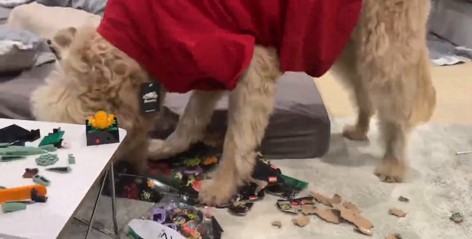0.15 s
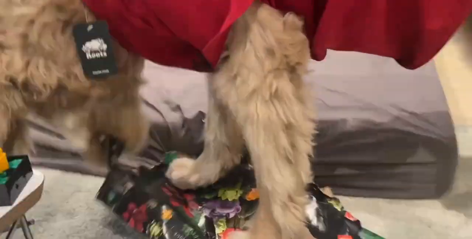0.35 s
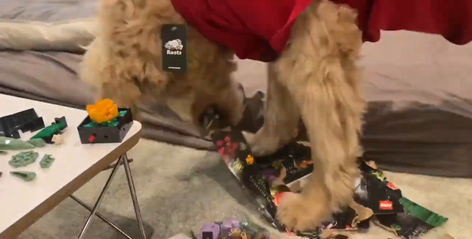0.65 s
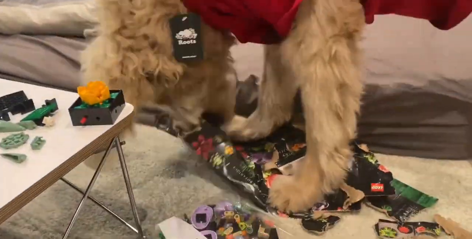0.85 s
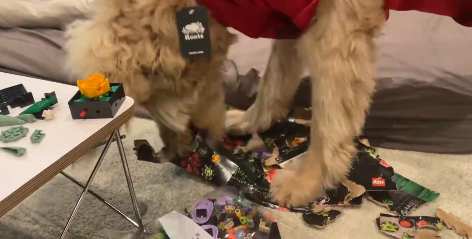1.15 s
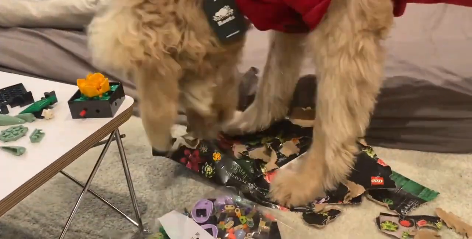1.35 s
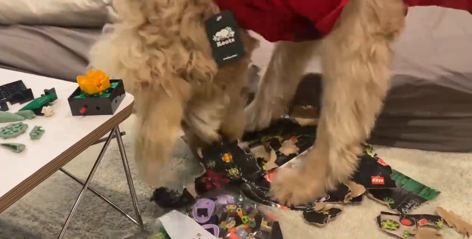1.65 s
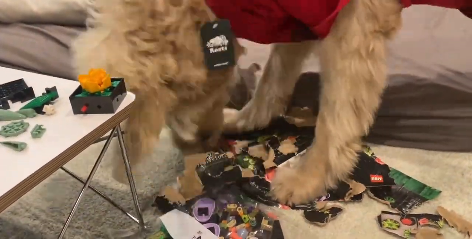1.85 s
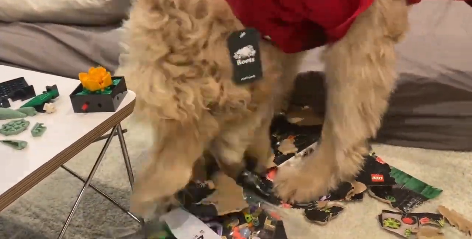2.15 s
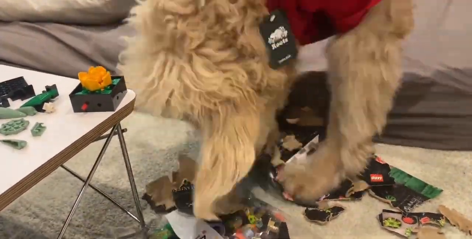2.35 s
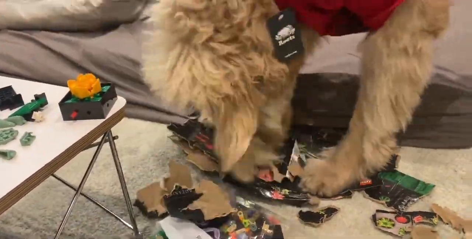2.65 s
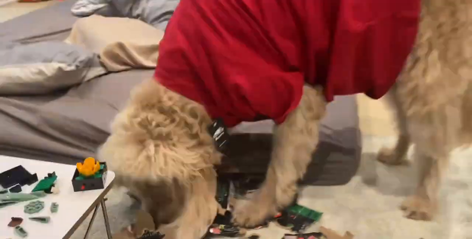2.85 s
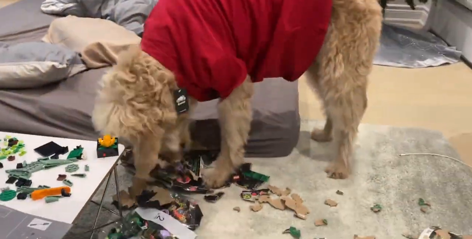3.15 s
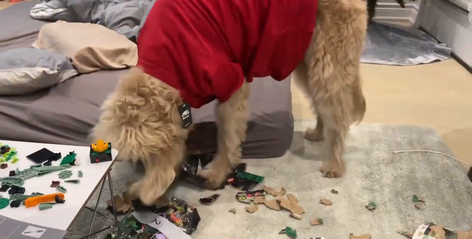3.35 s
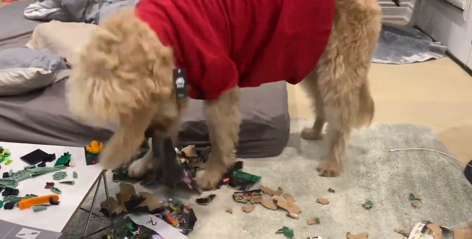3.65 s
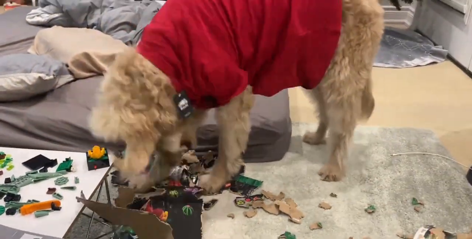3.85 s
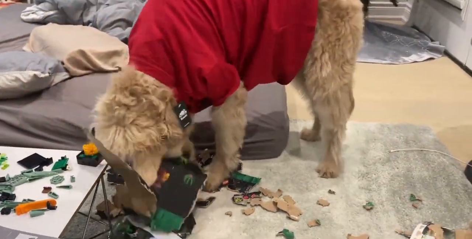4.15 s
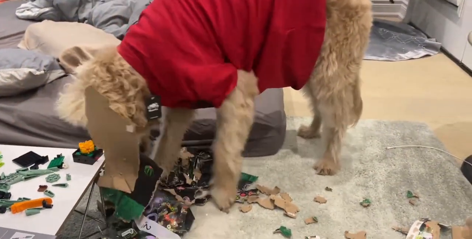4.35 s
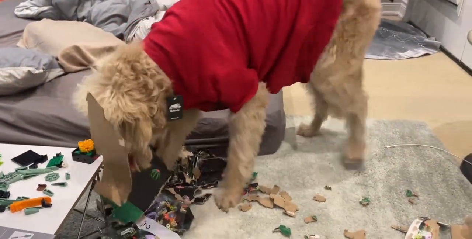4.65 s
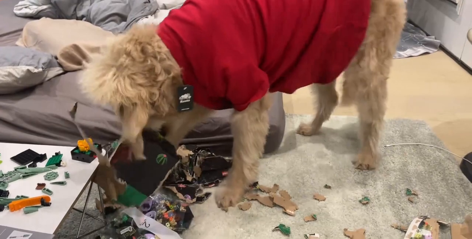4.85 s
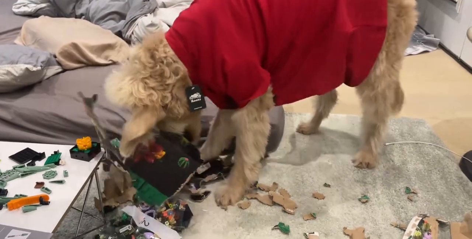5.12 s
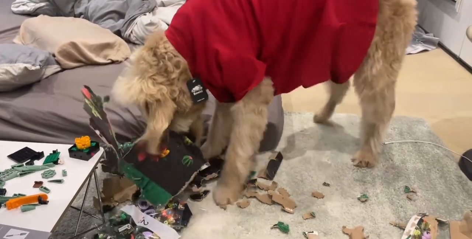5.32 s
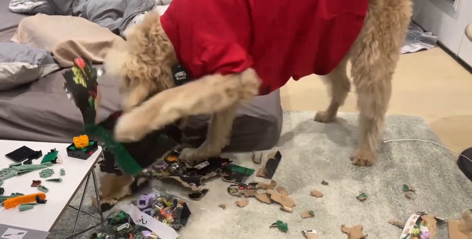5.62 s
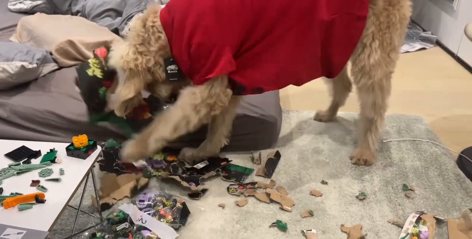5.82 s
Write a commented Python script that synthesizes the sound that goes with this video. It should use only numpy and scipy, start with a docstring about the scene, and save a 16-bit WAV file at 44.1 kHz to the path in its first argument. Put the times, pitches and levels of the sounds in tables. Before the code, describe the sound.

Close stereo sound of teeth tearing card among plastic scraps in a small, soft-furnished room. Bright cracks and fibrous rips cluster irregularly for two seconds, thin out, then return in short bursts. After a change from airy hum to deep rumble, mostly papery sliding, rug friction and light paw knocks remain, slightly left, ending with louder pawing blows on loose card.

```python
"""A dog tears up a printed cardboard box among plastic bags on a rug in a small furnished room. Tugs swell into
rips of crackling fibres; card snaps are short noise bursts with ringing modes of the sheet. Teeth scrape in
runs of slips and plastic crinkles in tiny fractures; near the end paws slap and push loose card. Beneath it all
lies a hum of shaped noise and narrow tones, which gives way to a rumble of shaped noise with a deep sine. The
dog drifts to the left of the microphone, and the rug and bedding leave a short room tail."""
import sys
import numpy as np
from scipy import signal
from scipy.fft import rfft, irfft
from scipy.io import wavfile
from scipy.ndimage import uniform_filter1d, map_coordinates

SR = 44100
rng = np.random.default_rng(int(sys.argv[2]) if len(sys.argv) > 2 else 0)


def pcm_store(signal):
    """Save signal as 16-bit PCM."""
    levels = np.round(np.clip(np.atleast_2d(signal), -1, 1) * 32767)
    wavfile.write(sys.argv[1], SR, levels.astype(np.int16).T)


N = 263718

# The card snaps. Each row: start in seconds, crack level in dB, body against the crack in dB,
# sizzle against the crack in dB, pitch of the knock in Hz, pitch of the crack in Hz.
CARD_SNAPS = [(0.074, -24, -3.5, -12.5, 800, 2670), (0.0784, -35.5, 5.5, -7, 725, 2740),
              (0.084, -43.5, 9, 4, 538, 2500), (0.136, -31, -35, -12, 410, 3870),
              (0.2032, -35, -9, -22, 1270, 2240), (0.243, -40.5, -8, -30, 420, 2020),
              (0.266, -39, -15, -12, 1480, 2620), (0.3352, -31.5, -2, 0.5, 1040, 2120),
              (0.3681, -34, -8, -3.5, 845, 4900), (0.469, -33.5, -2.5, -20, 1230, 3750),
              (0.477, -48, 7.5, -2, 480, 2080), (0.5454, -36.5, -15, -14, 1400, 2550),
              (0.553, -45.5, 3.5, -11, 1540, 4450), (0.5862, -34.5, -4, -9, 1290, 3500),
              (0.625, -49.5, 1, -2, 1080, 2500), (0.653, -50, 7.5, 0, 1140, 2650),
              (0.673, -37.5, -3.5, -7, 640, 2360), (0.7137, -41, -8, 2, 1350, 5400),
              (0.72, -38, -8, -8, 1300, 5160), (0.7333, -23.5, -2, -9, 1166, 5000),
              (0.739, -34, -27, 6.5, 440, 2450), (0.7561, -42, 0, -2, 1200, 5000),
              (0.772, -39, 6.5, 6.5, 1080, 1800), (0.7812, -37, -5.5, -3, 1460, 5150),
              (0.8957, -51.5, -2, -12, 1430, 1690), (0.9156, -34.5, -28, -2.5, 1500, 2100),
              (0.9225, -45, -14, -5, 1400, 2300), (0.929, -30.0, -10, -12, 1160, 4770),
              (0.945, -40, -10, 1.5, 640, 2160), (0.9754, -23, -1.5, -6, 1100, 4830),
              (1.096, -36, -9.5, -10, 1490, 2320), (1.1231, -42, -14, -3, 1110, 2500),
              (1.159, -40.5, -4, 0, 1350, 2100), (1.176, -30.5, 0, 1, 1350, 3980),
              (1.2407, -52.5, -4, -4, 580, 5000), (1.288, -40.5, -11, -10, 1490, 1990),
              (1.3244, -52.5, 8, 3, 476, 2300), (1.3747, -28, -7, -10.5, 1340, 5000),
              (1.3976, -26.5, -1.5, -2.5, 594, 2520), (1.5208, -40.5, -11, -6, 437, 3730),
              (1.534, -35.5, -10.5, 0, 1300, 5060), (1.5816, -34.5, -19, -2, 1400, 4490),
              (1.5945, -45, -3, -2, 1300, 4600), (1.6203, -36, -6, 0, 1120, 2170),
              (1.6275, -21.5, -4, -11, 1120, 2160), (1.629, -29.5, 1, 2, 1420, 3880),
              (1.6513, -34.5, 4, -4, 1400, 5450), (1.655, -29.5, -7, 2, 636, 5400),
              (1.7142, -38.5, -7, -8.5, 1120, 2260), (1.753, -72, -3, 15, 420, 4570),
              (1.8254, -50, -6, 1, 410, 4460), (1.8362, -46.5, -4, 6, 644, 4600),
              (1.847, -49.5, 0.5, -2, 1120, 2800), (1.8748, -28.5, -9, -4.5, 1070, 2250),
              (1.8799, -32.5, -1, -23, 1090, 2080), (1.9195, -49, -6, -1.5, 414, 2600),
              (2.0955, -29, 0.5, -4.5, 690, 1910), (2.162, -48, -12, -6, 600, 5460),
              (2.208, -48, -3, -1.5, 1130, 2600), (2.227, -45.5, -6, 3, 605, 5190),
              (2.2435, -46.5, -12, 2, 1310, 3980), (2.276, -43, -5, 5.5, 1390, 2050),
              (2.3264, -53, -7, 5, 1330, 4120), (2.4033, -46, 5.5, -6, 1120, 2180),
              (2.411, -41, -3.5, 2.5, 1240, 5560), (2.5589, -24.5, 2, -4.5, 1015, 3830),
              (2.7431, -49.5, -9, -12, 414, 5150), (2.9052, -54, -20, -24, 500, 4600),
              (2.958, -49.5, -6, -13, 440, 3200), (3.1252, -52, -10, -11, 800, 2900),
              (3.192, -46.5, 1, -9, 680, 4330), (3.2443, -33, 2, -31, 707, 3600),
              (3.373, -54, -15, 1.5, 590, 5430), (3.4136, -45, -10, -7, 594, 5570),
              (3.4373, -34.5, -17, -24, 507, 3820), (3.5694, -45, -3, -24, 630, 4350),
              (3.596, -31.5, -5, -26, 1530, 3870), (3.6158, -35, -6, -9, 660, 3500),
              (3.637, -45, -4, 0, 1300, 3950), (3.7042, -40, -10, -17, 710, 5350),
              (3.7744, -45.5, 4, -1, 520, 3300), (3.812, -44.5, -8, 4.5, 890, 2260),
              (3.8207, -41, 3, -8, 1410, 2800), (3.8567, -33.0, -5.5, -10, 1140, 3850),
              (3.883, -44, -13, -4, 550, 3400), (3.9085, -53.5, 3, -4, 487, 2800),
              (4.0866, -51.5, -2, -8, 430, 5600), (4.1277, -41, -10, -17, 1360, 3630),
              (4.2135, -41.5, -7, 0, 580, 2980), (4.23, -47.0, -5, -6, 464, 4000),
              (4.2509, -38.5, 0, -13, 1530, 4260), (4.2619, -25, 0, -9.5, 960, 4580),
              (4.2647, -35, 6.5, -5, 525, 3000), (4.3417, -56, 3, -16, 446, 2550),
              (4.3589, -27.5, -11, -5.5, 1540, 3490), (4.6397, -51.5, -5, -19, 814, 2900),
              (4.765, -54.5, -13, -16, 475, 3180), (4.7966, -52.5, -4, -7, 420, 2400),
              (5.223, -57, -1, 7, 585, 4500), (5.236, -49, -10, -3, 690, 3360),
              (5.2446, -43.5, -22.5, 4.5, 523, 3400), (5.95, -44.5, 12.5, -8.5, 1470, 4500)]
# Tugs that rip the card. Each row: height of the tug in seconds, length in seconds, crack level in dB,
# body against the crack in dB.
RIPPING_TUGS = [(0.015, 0.16, -38, -4.5), (0.072, 0.039, -34, -3), (0.266, 0.12, -49, 4.5),
                (0.348, 0.16, -36.5, -7.5), (0.468, 0.012, -24.5, -30), (0.479, 0.034, -36, 0),
                (0.554, 0.047, -41, -15), (0.734, 0.095, -31, -5), (0.764, 0.035, -36, -2),
                (0.911, 0.013, -43, -8), (0.927, 0.048, -41, -13), (1.18, 0.006, -31, -0.5),
                (1.137, 0.068, -37, -11), (1.338, 0.14, -42, -9), (1.543, 0.07, -37.5, -1),
                (1.592, 0.045, -33.5, -9), (1.644, 0.063, -27.5, -2.5), (1.854, 0.065, -40.5, -21),
                (1.881, 0.017, -31, -17), (2.061, 0.041, -43, -6), (2.265, 0.16, -43.5, -6),
                (2.412, 0.1, -40.5, -3), (2.469, 0.024, -44, -3), (2.545, 0.038, -40, -7),
                (2.999, 0.12, -47.5, 3), (3.14, 0.1, -50.5, -18), (3.244, 0.057, -38.5, 0),
                (3.437, 0.095, -46, -12), (3.594, 0.03, -34, -3), (3.609, 0.22, -40.5, -3),
                (3.709, 0.033, -33.5, -5.5), (3.777, 0.18, -39, -3), (4.125, 0.074, -46.5, -1),
                (4.26, 0.11, -40, -13), (4.355, 0.0054, -25.5, -19), (4.373, 0.039, -31.5, -17),
                (4.42, 0.053, -40.5, -7.5), (4.64, 0.094, -53.5, -4.5), (5.27, 0.092, -53, 3)]
# Teeth scrape along the card. Each row: start in seconds, length in seconds, level in dB, pitch in Hz.
TOOTH_SCRAPES = [(0.046, 0.0089, -40.5, 1430), (2.964, 0.015, -60, 2000), (3.007, 0.013, -42, 1530),
                 (3.671, .01, -48.5, 1500), (3.75, 0.025, -54, 2100)]
# How much scraps and bags shift under the dog. Each row: time in seconds, level in dB.
RUSTLE_LEVELS = [(0, -66), (.45, -56.5), (.82, -62), (1.08, -53), (1.24, -56.5), (2.0, -61.5), (2.35, -53),
                 (2.6, -60.5), (2.9, -60), (3.35, -61), (3.75, -56), (3.97, -61), (4.449, -60.5),
                 (4.7, -76.5), (5.13, -54.5), (5.3, -63.5), (5.819, -79.5), (5.89, -50), (5.94, -61),
                 (5.965, -45)]
# Colour of that rustle. In order: body, crack and sizzle, each against the level above in dB.
RUSTLE_COLOUR = [0, -3, -7]
# Paws on loose card. Each row: start in seconds, thump level in dB, clap level in dB, crack level in dB,
# pitch of the knock in Hz.
PAW_BLOWS = [(5.0398, -50, -38.5, -62, 597), (5.05, -67, -41, -55, 695), (5.106, -51, -59, -52, 734),
             (5.1679, -56, -42.5, -57, 482), (5.339, -69, -59, -57, 690), (5.864, -37.5, -44, -42, 394),
             (5.9503, -37, -26, -32.5, 509), (5.9602, -37.5, -27, -43, 890)]
# The big sheet rubs along the rug. Each row: time in seconds, level in dB.
RUB_LEVELS = [(5.03, -75), (5.06, -44), (5.09, -50.5), (5.125, -43.5), (5.2, -56), (5.25, -51), (5.32, -57),
              (5.42, -63)]
# Its printed face slides against fur and scraps. Each row: time in seconds, level in dB.
SLIDE_LEVELS = [(4.86, -97), (4.897, -58.5), (4.912, -50), (4.95, -60), (5.05, -47.5), (5.12, -51.5),
                (5.2, -72), (5.254, -41.5), (5.3, -60), (5.34, -59.5)]
# Resonances of the sliding face before it flexes. Each row: pitch in Hz, width in Hz, gain in dB.
SLIDE_RESONANCES = [(1400, 300, 0), (2900, 1200, 4), (4600, 860, -4), (11300, 2600, -9.5)]
# Resonances of the card before bending. Each row: pitch in Hz, width in Hz, gain in dB.
CARD_RESONANCES = [(449, 220, -2), (640, 120, 1.5), (840, 70, -13.5), (1100, 139, -8.5), (1400, 270, -6),
                   (1970, 290, -4), (2320, 990, 1), (3810, 70, 2), (4700, 940, -3), (12300, 1600, -27)]
# Registers of the card: body, crack, sizzle. Each row: low edge in Hz, high edge in Hz,
# share of the energy in the first spike (0 to 1), left-right likeness (0 to 1).
CARD_REGISTERS = [(394, 1657, 0.39, 0.87), (1490, 6550, 0.21, 0.64), (5650, 13670, 0.28, 0.36)]
# Registers of a paw's blow: thump, clap, crack. Each row: low edge in Hz, high edge in Hz,
# share of the energy in the first spike (0 to 1), left-right likeness (0 to 1).
BLOW_REGISTERS = [(114.5, 320, 0.17, 0.94), (395, 1200, 0.18, 0.66), (1244, 2930, 0.24, 0.3)]
# Left-right difference of the card sounds. Each row: time in seconds, side gain in dB.
SIDE_GAINS = [(.55, 1.5), (.72, -5), (0.948, -1), (2.1, -1.5), (2.3, -1.5), (4.35, -0.5), (4.6, 1.5)]
# Colour of the room's hum. Each row: pitch in Hz, relative density in dB per Hz.
HUM_COLOUR = [(24, -61.5), (40, -22.5), (98, -23), (221, -14), (338, -5), (412, 1.5), (728, -7.5),
              (845, -6), (1080, -10.5), (4680, -20.5), (7130, -41), (11400, -39), (13900, -45),
              (15000, -56.5)]
# Narrow tones in the hum. Each row: pitch in Hz, width of each of two resonances in Hz, level in dB.
HUM_TONE_ROWS = [(398, 6.3, -59), (425, 14, -65), (838, 8.2, -67)]
# Colour of the low rumble. Each row: pitch in Hz, relative density in dB per Hz.
RUMBLE_COLOUR = [(15, -27), (25, -4.5), (75, 4), (392, -5), (1820, -26.5), (2570, -20.5), (3460, -34.5),
                 (4450, -31), (6000, -46.5), (7800, -70), (13200, -120)]

TIME = np.arange(N) / SR
LEVEL_SPAN_S = .01   # the level of a blow is its energy spread over this time
CLICK = 1.15   # the instant of breaking, against the short burst that follows it
CUTOFF_HZ = 14550
# Air pushed by the snapping sheet: columns as in the registers; its level is against the body
FLAP, FLAP_DB = (187, 397, 0.13, 0.83), -28
KNOCK_HZ = 1040   # middle of the knocks
# The lowest mode of the whole sheet, woken by every snap: its level against a middling knock,
# and how much stronger it is under higher ones
SHEET_HZ, SHEET_DB, SHEET_DB_PER_OCTAVE = 440, -12.5, 3.5
# Middle of the cracks, top of a middling crack's band, and how far the band follows the pitch
CRACK_HZ, CRACK_TOP_HZ, CRACK_FOLLOWS = 2800, 5800, 0.27
RING_DB_PER_BODY_DB = -0.25   # thin snaps ring more in crack and sizzle
# Part of a tug spent swelling; its sizzle against its crack
SWELL_SHARE, TEAR_SIZZLE_DB = 0.51, -1
# Fibres splinter around a snap: how long, how loud against it, how far this follows its body
SPLINTER_S, SPLINTER_DB, SPLINTER_FOLLOWS = 0.02, -6.5, 0.29
PAW_OVERTONE = 1.88   # second mode of the slapped sheet, as a multiple of its knock
LAST_STRETCH_S = 4.466   # from here the sheet lies to the left, the rumble sounds and the top is softer
LEFT_LEAD_S = 0.00021   # the sheet's sound then reaches the left side earlier by this
ROOM_T60_S, ROOM_DB = 0.091, -11.5
HUM_DB, RUMBLE_DB, DRONE_DB, DRONE_HZ = -55.5, -54.5, -57, 58.6


def from_db(db):
    """Decibels to gain."""
    return 10 ** (np.asarray(db) / 20)


def rms_one(x):
    """Scale to rms 1."""
    return x / np.sqrt(np.mean(x ** 2) + 1e-20)


def energy_one(x):
    """Scale to energy 1 in each channel on average."""
    return rms_one(x) / np.sqrt(x.shape[-1])


def add(out, s, sound):
    """Mix a sound into out from time s on."""
    start = round(s * SR)
    part = sound[:, :N - start]
    out[:, start:start + part.shape[1]] += part


def stereo_noise(size, alike):
    """White noise whose two channels are partly the same."""
    mid, side = rng.standard_normal((2, size))
    return np.sqrt(1 + alike) * mid + np.sqrt(1 - alike) * side * [[1], [-1]]


def band(x, low_hz, high_hz, order=3):
    """Causal band-pass."""
    return signal.sosfilt(signal.butter(order, [low_hz, high_hz], "band", fs=SR, output="sos"), x)


def resonate(x, hz, width_hz):
    """One resonance, gain 1 on top."""
    r = np.exp(-np.pi * width_hz / SR)
    feedback = [1, -2 * r * np.cos(2 * np.pi * hz / SR), r * r]
    return signal.lfilter(np.array([1, 0, -1]) * (1 - r * r) / 2, feedback, x)


def die_away(power, t60):
    """Spread each impulse of power over an exponential decay."""
    r = from_db(-60 / (t60 * SR)) ** 2
    return signal.lfilter([1 - r], [1, -r], power + 1e-18)


def card_colour(x, stretch=1):
    """The resonances of the card stand out of a broad response; bending stretches their pitch."""
    return x + sum(from_db(gain_db) * resonate(x, hz * stretch, width_hz)
                   for hz, width_hz, gain_db in CARD_RESONANCES)


def kinks(count, register, spike_s, t60, pitches_hz=(), breadth=1.0, rings_db=0, stretches=None, bend=0.36):
    """Sudden buckles at 0 dB: a spike, then a decaying noise ring, drawn afresh for each."""
    low_hz, high_hz, share, alike = register
    t = TIME[:3000]
    raw = np.array([[stereo_noise(len(t), np.sqrt(alike)) * np.exp(-t / spike_s),
                     stereo_noise(len(t), alike) * from_db(-60 * t / t60)] for _ in range(count)])
    # the instant of breaking, on the first sample of each spike
    raw[:, 0, :, 0] += CLICK * np.sqrt(spike_s * SR / 2) * rng.choice([-1, 1], (count, 1))
    for k, hz in enumerate(pitches_hz):   # the smaller the piece that gives way, the higher it sounds
        raw[k] = resonate(raw[k], hz, breadth * hz)
    if stretches is None:
        voiced = band(card_colour(raw), low_hz, high_hz)
    else:   # each piece has a band of its own, and bends the card's resonances along
        voiced = [band(card_colour(x, by ** bend), low_hz * by, high_hz * by, order=4)
                  for x, by in zip(raw, stretches)]
    ring_gains = from_db(np.broadcast_to(rings_db, count))
    blends = [np.sqrt(share) * energy_one(spike) + np.sqrt(1 - share) * gain * energy_one(ring)
              for (spike, ring), gain in zip(voiced, ring_gains)]
    return [energy_one(blend) * np.sqrt(LEVEL_SPAN_S * SR) for blend in blends]


def pitched(sounds, pitches_hz, cycles, mode_db, low_hz=330):
    """The piece that gives way also rings at its own pitch, dying within some cycles; too small to radiate bass."""
    t = TIME[:sounds[0].shape[1]]
    modes = [np.sin(2 * np.pi * hz * t) * from_db(-60 * hz * t / cycles) for hz in pitches_hz]
    modes = band(np.array(modes), low_hz, CUTOFF_HZ)
    gains = from_db(np.broadcast_to(mode_db, len(sounds)))
    return [energy_one(energy_one(sound) + gain * energy_one(mode)) * np.sqrt(LEVEL_SPAN_S * SR)
            for sound, gain, mode in zip(sounds, gains, modes)]


def crackle(per_s, spread_db, spike_t60, ring_t60, even_s, count=3):
    """Tiny uneven fractures, each a spike and a ring coloured in count bands; one rms-1 stream a register."""
    at = np.flatnonzero(rng.random(N) < per_s / SR)
    sizes_db = np.broadcast_to(spread_db, N)[at] * np.minimum(rng.exponential(1, len(at)), 4.5)
    streams = []
    for low_hz, high_hz, share, alike in CARD_REGISTERS:
        breaks = np.zeros((count, N))
        colours_db = rng.uniform(-12, 12, (len(at), count)).T
        breaks[:, at] = from_db(sizes_db + colours_db) ** 2
        power = share * die_away(breaks, spike_t60) + (1 - share) * die_away(breaks, ring_t60)
        # the pull sets the overall rate of work
        power /= np.maximum(uniform_filter1d(power.mean(axis=0), int(even_s * SR)), 1e-9)
        edges = np.geomspace(low_hz, high_hz, count + 1)
        grains = sum(band(stereo_noise(N, alike) * np.sqrt(p), low, high, order=2)
                     for p, low, high in zip(power, edges, edges[1:]))
        streams.append(rms_one(card_colour(grains)))
    return streams


def stick_slip(per_s, t60, spread_db):
    """Uneven catches and slips of a dragged surface, as a gain around 1."""
    slips = rng.random(N) < per_s / SR
    power = die_away(slips * from_db(spread_db * rng.standard_normal(N)) ** 2, t60)
    return np.sqrt(power / np.maximum(uniform_filter1d(power, int(.04 * SR)), 1e-9))


def tears(roundness=0.87):
    """Fibres break in a rush that swells and fades with each tug; a brief rush also surrounds each snap."""
    tugs = [(s, length_s, db + np.array([body_db, 0, TEAR_SIZZLE_DB]))
            for s, length_s, db, body_db in RIPPING_TUGS]
    splinters = [(s, SPLINTER_S,
                  db + SPLINTER_DB + SPLINTER_FOLLOWS * body_db + np.array([body_db, 0, sizzle_db]))
                 for s, db, body_db, sizzle_db, _, _ in CARD_SNAPS]
    power = np.zeros((3, N))
    for s, length_s, levels_db in tugs + splinters:
        near = slice(max(int((s - .25) * SR), 0), int((s + .25) * SR))
        t = TIME[near] - s
        away = np.abs(t / (length_s * np.where(t < 0, SWELL_SHARE, 1 - SWELL_SHARE)))
        power[:, near] += from_db(levels_db[:, None] - 20 * away ** roundness) ** 2
    fibres = crackle(per_s=1500, spread_db=5, spike_t60=.0014, ring_t60=.016, even_s=.014)
    return sum(np.sqrt(p) * stream for p, stream in zip(power, fibres))


def torn_piece(x, boost=0.93, breadth=0.13):
    """A rip sounds through the piece being torn: a resonance glides from the pitch of one crack to the next."""
    s, *_, crack_hz = np.transpose(CARD_SNAPS)
    octave = np.interp(TIME, s, np.log2(crack_hz))
    steps = np.arange(10.5, 12.75, .25)   # fixed resonances in octaves above 1 Hz, crossfaded for the glide
    ring = sum(np.interp(octave, steps, steps == step) * resonate(x, 2 ** step, breadth * 2 ** step)
               for step in steps)
    return (x + boost * ring) / np.sqrt(1 + boost / 4)


def snaps(scatter_db=1.26):
    """Teeth break or fold the card, each time with its own knock, crack and slightly different direction."""
    out = np.zeros((2, N))
    times, strength_db, body_db, sizzle_db, knock_hz, crack_hz = np.transpose(CARD_SNAPS)
    count = len(times)
    pan_db = scatter_db * rng.standard_normal(count)
    body, crack, sizzle = CARD_REGISTERS
    ring_db = RING_DB_PER_BODY_DB * body_db
    # bursts are centred halfway, in octaves, between the middle pitch and their own
    knocks = kinks(count, body, spike_s=0.00043, t60=0.026,
                   pitches_hz=np.sqrt(KNOCK_HZ * knock_hz), breadth=1.2)
    sheet_db = SHEET_DB + SHEET_DB_PER_OCTAVE * np.log2(knock_hz / KNOCK_HZ)
    knocks = pitched(knocks, np.full(count, SHEET_HZ), cycles=25, mode_db=sheet_db)
    knocks = pitched(knocks, knock_hz, cycles=24.6, mode_db=-4.5)
    cracks = kinks(count, (crack[0], CRACK_TOP_HZ, *crack[2:]), spike_s=0.0003, t60=0.025,
                   pitches_hz=np.sqrt(CRACK_HZ * crack_hz), rings_db=ring_db,
                   stretches=(crack_hz / CRACK_HZ) ** CRACK_FOLLOWS)
    cracks = pitched(cracks, crack_hz, cycles=36, mode_db=-1)
    flaps = kinks(count, FLAP, spike_s=0.0013, t60=0.049)
    sizzles = kinks(count, sizzle, spike_s=0.00038, t60=0.027, rings_db=ring_db)
    layers = [(body_db + FLAP_DB, flaps), (body_db, knocks), (0, cracks), (sizzle_db, sizzles)]
    for colour_db, sounds in layers:
        for s, level_db, side_db, sound in zip(times, strength_db + colour_db, pan_db, sounds):
            add(out, s, sound * from_db(level_db + np.array([[1], [-1]]) * side_db / 2))
    return out


def scrapes(slips_per_s=260, slip_t60=0.016, breadth=0.89):
    """A tooth judders over the card: a short run of slips, each ringing the strip that it holds."""
    out = np.zeros((2, N))
    for s, length_s, level_db, hz in TOOTH_SCRAPES:
        slips = np.zeros(SR // 8)
        gaps, sizes = rng.uniform(.5, 1.5, (2, 30))   # gaps as multiples of the mean gap
        at_s = (np.cumsum(gaps) - gaps[0]) / slips_per_s
        inside = at_s <= length_s
        slips[(at_s[inside] * SR).astype(int)] = sizes[inside] ** 2
        friction = stereo_noise(len(slips), alike=0.97) * np.sqrt(die_away(slips, slip_t60))
        voiced = resonate(resonate(friction, hz, breadth * hz), hz, breadth * hz)
        add(out, s, from_db(level_db) * energy_one(voiced) * np.sqrt(length_s * SR))
    return out


def rustle(crisp_db=5.0, soft_db=1.5):
    """Plastic and scraps crinkle; once the dog only pushes the sheet about, the grain turns fine and even."""
    s, level_db = np.transpose(RUSTLE_LEVELS)
    spread_db = np.interp(TIME, [4.35, 4.55], [crisp_db, soft_db])
    creases = crackle(per_s=1200, spread_db=spread_db, spike_t60=.0012, ring_t60=0.016, even_s=0.11)
    coloured = sum(from_db(db) * stream for db, stream in zip(RUSTLE_COLOUR, creases))
    return from_db(np.interp(TIME, s, level_db)) * coloured


def sheet_reflection(x, bounce=0.43, shortest_s=0.00024, longest_s=0.001234, ear_gap_s=.00007, moves_per_s=4):
    """A bounce off the nearby sheet, whose delay wanders at random, giving rips and rustle a shifting hollow colour."""
    delays_s = rng.uniform(shortest_s, longest_s, 100)
    delay_s = np.interp(TIME * moves_per_s, np.arange(len(delays_s)), delays_s)
    echo = [np.interp(TIME - delay_s - k * ear_gap_s, TIME, channel, left=0) for k, channel in enumerate(x)]
    # long waves pass round the sheet
    bright = signal.sosfilt(signal.butter(1, 900, "high", fs=SR, output="sos"), echo)
    return (x + bounce * bright) / np.sqrt(1 + bounce ** 2 / 2)


def paws():
    """A soft pad drives the whole sheet: a firm clap with a hollow two-tone knock in it, a thump and a crack."""
    out = np.zeros((2, N))
    count = len(PAW_BLOWS)
    knock_hz = np.array([row[-1] for row in PAW_BLOWS])
    thump_register, clap_register, crack_register = BLOW_REGISTERS
    thumps = kinks(count, thump_register, spike_s=0.0015, t60=0.041)
    claps = kinks(count, clap_register, spike_s=0.00047, t60=0.033, pitches_hz=np.full(count, KNOCK_HZ))
    cracks = kinks(count, crack_register, spike_s=0.0007, t60=0.24)
    claps = pitched(claps, PAW_OVERTONE * knock_hz, cycles=17, mode_db=-11)
    claps = pitched(claps, knock_hz, cycles=55, mode_db=-0.5)
    for (s, thump_db, clap_db, crack_db, _), thump, clap, crack in zip(PAW_BLOWS, thumps, claps, cracks):
        add(out, s, from_db(thump_db) * thump + from_db(clap_db) * clap + from_db(crack_db) * crack)
    return out


def rub(low_hz=390, high_hz=1000):
    """Dragged over the rug, the sheet catches and slips, and sounds only its lowest resonances."""
    s, level_db = np.transpose(RUB_LEVELS)
    slips = stick_slip(per_s=380, t60=.025, spread_db=2)
    friction = rms_one(band(stereo_noise(N, alike=0.97) * slips, low_hz, high_hz, order=4))
    return from_db(np.interp(TIME, s, level_db, left=-np.inf, right=-np.inf)) * friction


def flexing(x):
    """As the sheet flexes, its resonances wander up and down by up to a sixth, a dozen times a second."""
    poses = rng.uniform(-.16, .16, 80)
    speed = 1 + np.interp(TIME * 12, np.arange(len(poses)), poses)
    return np.array([map_coordinates(channel, [np.cumsum(speed)], order=3, mode="mirror") for channel in x])


def slide():
    """Fine-grained papery friction, heard through a few broad resonances."""
    s, level_db = np.transpose(SLIDE_LEVELS)
    friction = stereo_noise(N, alike=0.16) * stick_slip(per_s=350, t60=0.06, spread_db=-1.5)
    voiced = sum(from_db(gain_db) * resonate(resonate(friction, hz, width_hz), hz, width_hz)
                 for hz, width_hz, gain_db in SLIDE_RESONANCES)
    level = from_db(np.interp(TIME, s, level_db, left=-np.inf, right=-np.inf))
    return level * rms_one(flexing(voiced))


def side_scaled(x):
    """The left-right difference of the card sounds is scaled by a gain that varies over time."""
    s, side_db = np.transpose(SIDE_GAINS)
    mid = x.mean(axis=0)
    return mid + from_db(np.interp(TIME, s, side_db)) * (x - mid)


def off_centre(x):
    """Once the sheet has moved aside, the right channel hears it a little later."""
    lag_s = LEFT_LEAD_S * np.clip((TIME - LAST_STRETCH_S) / 0.023, 0, 1)
    return np.array([x[0], map_coordinates(x[1], [(TIME - lag_s) * SR], order=3)])


def room(x, first_echo_s=0.0015, alike=0.97):
    """Rug and bedding leave only a short diffuse tail."""
    t = TIME[:SR // 2]
    tail = stereo_noise(len(t), alike) * from_db(-60 * t / ROOM_T60_S) * (t > first_echo_s)
    return from_db(ROOM_DB) * signal.fftconvolve(x, energy_one(tail), axes=1)[:, :N]


def dulled(x, top_hz=11500):
    """In the last stretch the very top is softer."""
    later = np.clip((TIME - LAST_STRETCH_S) / 0.0082 + .5, 0, 1)
    soft = signal.sosfilt(signal.butter(4, top_hz, fs=SR, output="sos"), x)
    return (1 - later) * x + later * soft


def steady(spectrum, alike):
    """Smooth noise of a given colour, rms 1."""
    hz, level_db = np.transpose(spectrum)
    bins_hz = np.maximum(np.arange(N // 2 + 1) * SR / N, 1)
    colour = from_db(np.interp(np.log(bins_hz), np.log(hz), level_db))
    return rms_one(irfft(rfft(stereo_noise(N, alike)) * colour, N))


def background():
    """An airy hum gives way abruptly to a low rumble with a deep tone in it."""
    later = np.clip((TIME - LAST_STRETCH_S) / 0.014 + .5, 0, 1)
    hum = from_db(HUM_DB) * steady(HUM_COLOUR, alike=0.74)
    for hz, width_hz, level_db in HUM_TONE_ROWS:
        narrow = resonate(resonate(stereo_noise(N, alike=0.94), hz, width_hz), hz, width_hz)
        hum += from_db(level_db) * rms_one(narrow)
    rumble = from_db(RUMBLE_DB) * steady(RUMBLE_COLOUR, alike=0.7)
    tone = from_db(DRONE_DB) * np.sqrt(2) * np.sin(2 * np.pi * DRONE_HZ * TIME)
    return (1 - later) * hum + later * (rumble + tone)


def scene(drift_db=1.5):
    """The dog works its way to the left of the microphone; room and background surround it."""
    left_over_right_db = np.interp(TIME, [1.8, 4.4, 5.2], [0, 0.31 * drift_db, drift_db])
    leftward = from_db(np.array([[1], [-1]]) * left_over_right_db / 2)
    near_sheet = sheet_reflection(torn_piece(tears()) + rustle())
    card = near_sheet + snaps() + scrapes() + paws() + rub() + slide()
    work = off_centre(leftward * side_scaled(card))
    return dulled(work + room(work)) + background()


def record(dry):
    """The top is cut steeply."""
    return signal.sosfilt(signal.ellip(10, .2, 75, CUTOFF_HZ, fs=SR, output="sos"), dry)


dry = scene()
out = record(dry)
pcm_store(out)
```